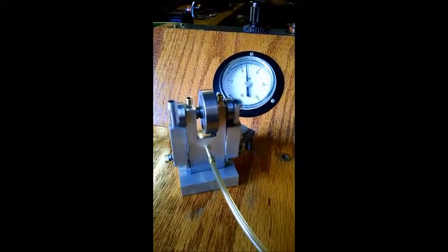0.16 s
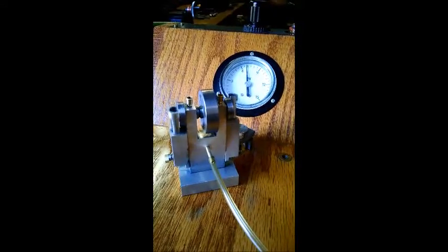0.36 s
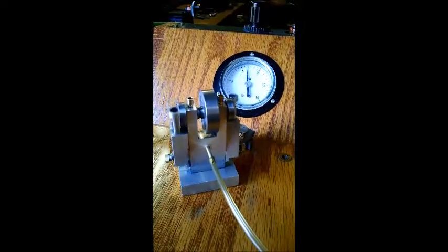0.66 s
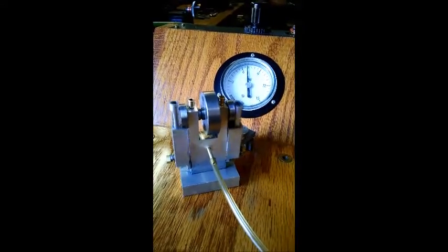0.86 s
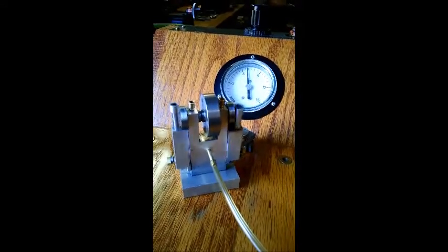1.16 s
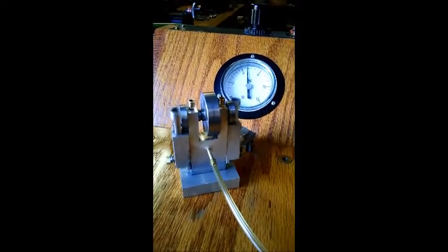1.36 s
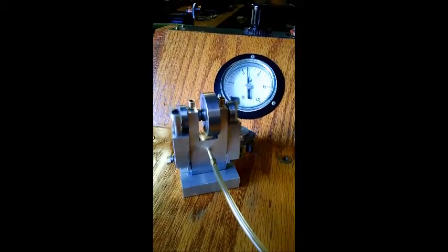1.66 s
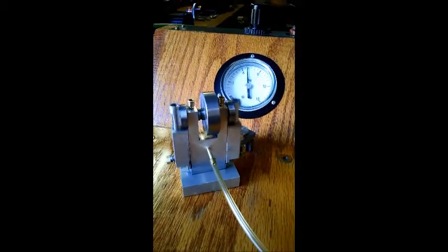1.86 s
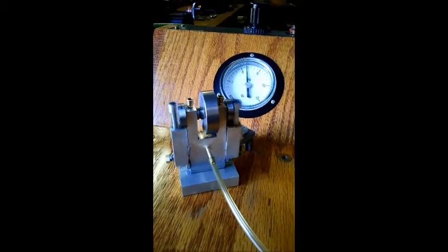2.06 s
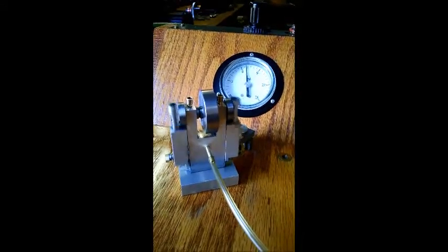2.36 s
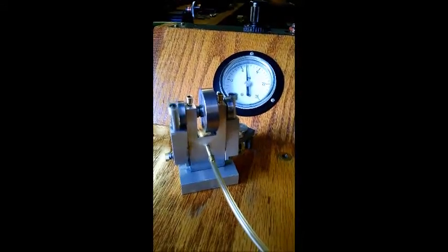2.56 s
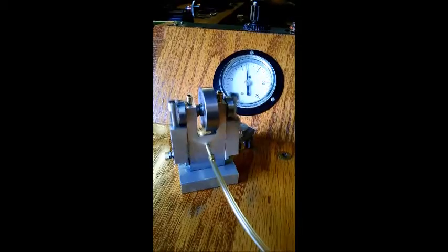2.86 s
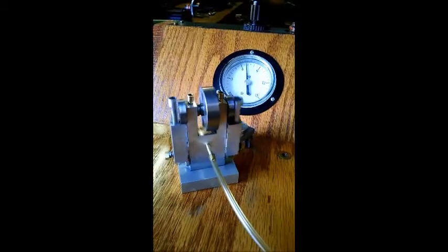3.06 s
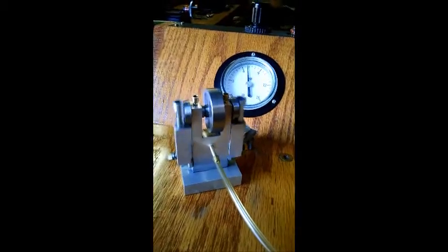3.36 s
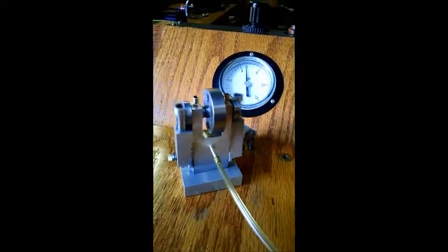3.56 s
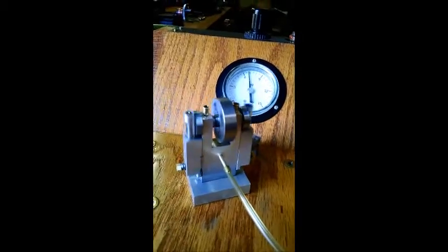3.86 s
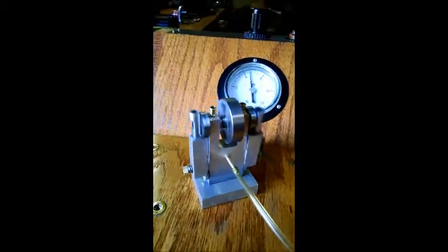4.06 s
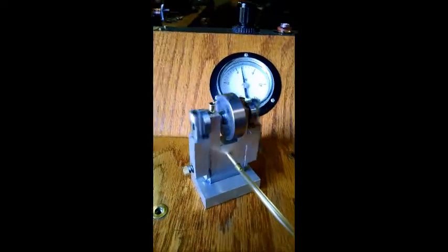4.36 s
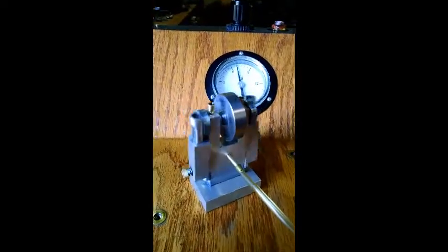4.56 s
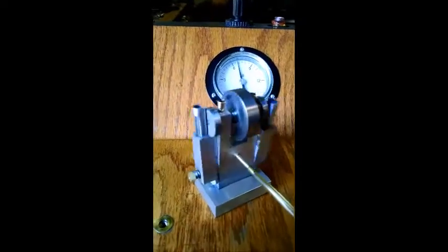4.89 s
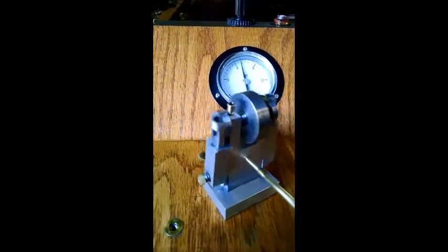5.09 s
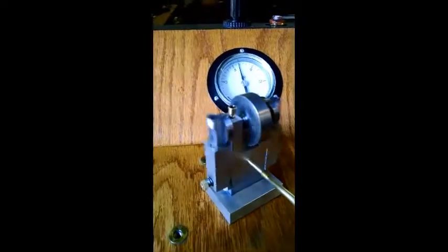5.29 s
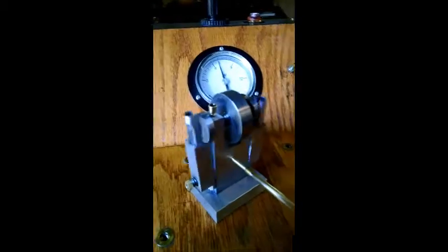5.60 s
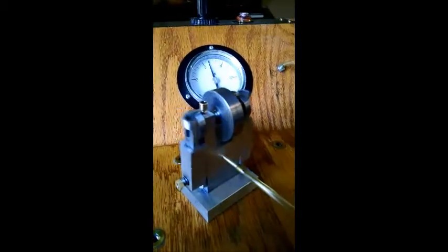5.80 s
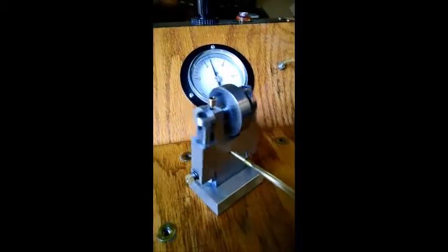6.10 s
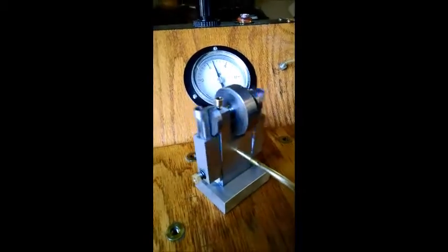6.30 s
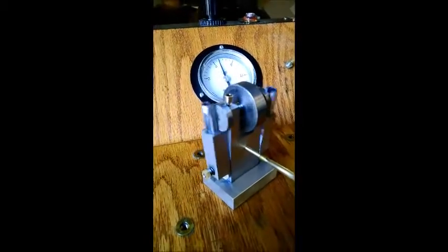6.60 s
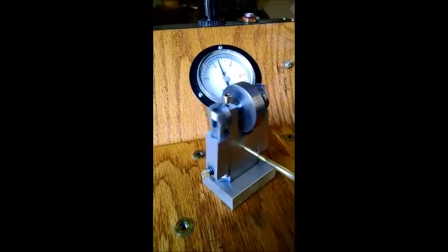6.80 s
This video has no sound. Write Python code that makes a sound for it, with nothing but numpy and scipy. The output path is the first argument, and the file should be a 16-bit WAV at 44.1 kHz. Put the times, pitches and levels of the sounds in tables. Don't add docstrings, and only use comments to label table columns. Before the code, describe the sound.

A steady fast rhythm of bright, spitting exhaust bursts, each followed by a softer second puff, with short dull knocks from the wooden tabletop and dry metallic clicking and rattling. Continuous thin air hiss pulses with the rhythm over a faint low room murmur. Recorded very close on a handheld phone in stereo; after it moves round, a high airy whistle grows, with small handling knocks and a brief sleeve brush near the end.

```python
import sys
import numpy as np
from scipy import signal
from scipy.fft import rfft, irfft
from scipy.io import wavfile
from scipy.ndimage import uniform_filter1d

SR = 44100
rng = np.random.default_rng(int(sys.argv[2]) if len(sys.argv) > 2 else 0)


def how_loud(loudness_db):
    steps = np.asarray(loudness_db, float) / 20
    return 10 ** steps


def store_wav(level_fs):
    pcm = np.round(np.clip(np.atleast_2d(level_fs), -1, 1) * 32767)
    wavfile.write(sys.argv[1], SR, pcm.T.astype(np.int16))


N = 306054
T = np.arange(N) / SR
HZ = np.fft.rfftfreq(N, 1 / SR)
TURN_ROUND_S = 3.8, 4.5

# [f/Hz, crack treble level/dB, crack body level/dB, blow-down level/dB, leak level/dB]
AIR_COLOURS = [(1445, -43, -15, -33, -37), (2680, -43, -12.5, -24, -6), (3756, -45, -11.5, -18.5, -15),
               (5420, -47, 8.5, -2.5, -10.5), (6570, -34, -6, -1, -21.5), (7860, -34, 7.5, 5, -10.5),
               (8830, -18, -4, -8, 1.5), (10500, -14, -7.5, -4.5, -6.5), (12500, -16, -15, -1, -14.5),
               (15500, -8, -28, -4.5, -21)]
# [t/s, hiss level/dB, whistle level/dB]
FITTING = [
    (0, -42.5, -52),
    (1.501, -42, -59),
    (3.001, -41.5, -61),
    (4, -41.5, -57),
    (4.8, -40, -42),
    (5.8, -40, -42),
    (6.94, -39.5, -47),
]
# [f/Hz, t60/s, then level/dB in each of the four clacks]
FRAME_MODES = [(314, 0.036, -7, -11.5, 1.5, 1.5), (432, 0.033, -4.5, -5.5, -2, -35),
               (817, 0.046, -8, -7.5, -4, 1), (942.6, 0.052, -6, -8.5, -9, -30),
               (1032, 0.023, -0.5, 5.5, 6.5, 11), (1201, 0.044, -6, -5.5, 0.5, 1.5),
               (1357, 0.035, -2.5, 9, 2, 4.5), (1527, 0.0081, -10, -7.5, -5, -44),
               (1893, 0.068, -21.5, -4.5, -11.5, -13), (2183, 0.022, -11, -7, -5.5, -18),
               (3293, 0.025, -13, -31, -19, -3)]


def exhaust():
    # [f/Hz, level/dB]
    shade = [(4500, -2.5), (5400, -5.5), (6300, 0), (7100, 1), (7900, -4), (8600, 0.5), (12000, 0),
             (14600, -2)]
    # [share of turn, top level/dB, rise/dB per turn, fall/dB per turn]
    crack_lobes = [
        (0, 0.5, 195, 162),
        (0.839, -22, 330, 200),
    ]
    blow_lobes = [
        (0, -6, 149, 40.3),
        (0.251, 0, 57.8, 90),
        (.45, -9, 60, 75),
    ]
    crack_s, treble_db, puff_db = crank()[:3]
    chance = rng.standard_normal((3, len(crack_s))).clip(-2, 2)
    treble_db = treble_db + 0.3 * chance[0]
    puff_db = puff_db + 1.0 * chance[1]
    body_db = -30.5
    turns = angle()
    nearest = np.round(turns).astype(int)
    crack_db = opening(turns, crack_lobes, shut_db=-33.5)
    blow_db = opening(turns, blow_lobes, shut_db=-39)
    crack_db *= 1 + 0.1 * chance[2][nearest]

    hz, treble, body, blow, _ = np.transpose(AIR_COLOURS)
    flutter_db = 0.94 * walk(150)
    out = colour(hz, treble) * how_loud(crack_db + treble_db[nearest] + flutter_db)
    out += colour(hz, body) * how_loud(0.55 * crack_db + body_db + 2.5 + flutter_db)
    puff = colour(hz, blow) * how_loud(blow_db + np.interp(T, crack_s + 0.035, puff_db) + 1.5 * walk(90))
    low = signal.sosfiltfilt(signal.butter(4, 10500, fs=SR, output="sos"), puff)
    high = puff - low
    turned = phone_turned()
    out += low * how_loud(0.47 * walk(8.5))
    out += high * how_loud(0.71 * walk(11) + 0.5 * turned)
    shaded = irfft(rfft(out) * how_loud(np.interp(HZ, *np.transpose(shade))), N)
    return turned * out + (1 - turned) * shaded


def table_thumps():
    # [f/Hz, level/dB, t60/s]
    table_modes = [(193, -23, 0.26), (238.7, -8, 0.17), (329.8, -2.5, 0.11), (389, 13.5, 0.02),
                   (428.7, 0, 0.1), (545, -9.5, 0.04), (729, -9, .03)]
    out = np.zeros((2, N))
    hard_db, soft_db = crank()[3:]
    hard_db = hard_db + odd_turns()[0]
    for share, level_db in ((0.362, hard_db), (0.894, soft_db)):
        for s, db in beats(share, level_db, scatter_db=0.5):
            strike(out, s, db, *np.transpose(table_modes), push_s=0.0012)
    return out


def linkage_clacks():
    # [share of turn after the crack, level/dB, scatter/dB, level change once the phone has turned/dB]
    clack_rows = [
        (-.165, -33.5, 1.64, 1.1),
        (.006, -34.5, 1.3, -1.5),
        (.203, -37, 2, -0.5),
        (.37, -38, 2.5, -1.4),
    ]
    out = np.zeros((2, N))
    hz, t60, *mode_levels = np.transpose(FRAME_MODES)
    extra_db = odd_turns()[1]
    for k, (share, level_db, scatter_db, turned_db) in enumerate(clack_rows):
        level_db = level_db + np.interp(crank()[0], TURN_ROUND_S, [0, turned_db])
        if k == len(clack_rows) - 1:
            level_db = level_db + extra_db
        for s, db in beats(share, level_db, scatter_db):
            strike(out, s, db, hz, mode_levels[k], t60, push_s=0.0007)
    return out


def valve_ticks():
    # [f/Hz, level/dB, t60/s]
    valve_modes = [(3100, 0, .015), (3500, 0, .015), (3950, -2, .012)]
    out = np.zeros((2, N))
    for s, db in beats(0.725, -52, scatter_db=2.0):
        strike(out, s, db, *np.transpose(valve_modes), push_s=0.0003)
    return out


def rattle():
    out = np.zeros((2, N))
    hz, t60, mode_db = np.transpose(FRAME_MODES)[:3]
    taps_per_s = 150
    for when, size in rng.random((int(taps_per_s * N / SR), 2)):
        db = -51.5 - 2.5 * np.log(size + 0.00029)
        strike(out, when * T[-1], db, hz, mode_db, 0.59 * t60, push_s=0.0004, scatter_db=8.0, detune=0.069)
    return out


def leak():
    s, hiss_db, _ = np.transpose(FITTING)
    air = np.transpose(AIR_COLOURS)
    return colour(air[0], air[4]) * how_loud(np.interp(T, s, hiss_db) + supply_swing() + 2.6 * walk(40))


def whistle():
    s, _, whistle_db = np.transpose(FITTING)
    hz = 9100 + 330 * np.array([-3, -1, 0, 1, 2, 4])
    level_db = np.interp(T, s, whistle_db) + supply_swing() + 3.0 * walk(45)
    near, far = colour(hz, [-22, -4, 0, -5, -13, -24]) * how_loud(level_db)
    return np.array([near, 0.41 * near + 0.13 * far])


def hand_bumps():
    # [t/s, level/dB, f/Hz, t60/s]
    bump_rows = [
        (0.1534, -34, 170, 0.049),
        (0.1528, -26, 540, 0.0054),
        (3.29, -39, 90, .12),
        (4.271, -42, 95, 0.11),
        (5.257, -36, 408, 0.056),
        (5.258, -39, 1350, 0.024),
    ]
    out = np.zeros((2, N))
    for s, db, hz, t60 in bump_rows:
        modes_hz = hz * np.array([1, 1.35, 1.75])
        strike(out, s, db, modes_hz, np.array([0, 0, -3.0]), t60 * np.ones(3), push_s=0.0008)
    return out


def sleeve_brush():
    # [t/s, level/dB]
    brush_db = [
        (5.98, -45),
        (6.0, -35),
        (6.05, -28.5),
        (6.1, -33),
        (6.14, -44),
        (6.2, -66),
    ]
    brush = colour([900, 1500, 2500, 5000, 9000, 14000], [-8, -4.5, -7.5, -2.0, -1.5, -11.5])
    return brush * how_loud(np.interp(T, *np.transpose(brush_db), left=-90, right=-90) + 1.2 * walk(120))


def room():
    # [f/Hz, level/dB]
    murmur = [(25, -1), (33, -2.5), (48, -3), (60, 1), (72, 1.5), (160, -8), (250, -10.5), (440, -2),
              (600, -9), (1300, -12), (2000, -21.5), (4000, -27.5)]
    return colour(*np.transpose(murmur)) * how_loud(-45.5 + 0.43 * walk(6))


def crank():
    # [crack t/s, crack treble level/dB, second puff level/dB, hard thump level/dB,
    # soft thump level/dB]
    third_turns = [(-0.0299, -18, -28.5, -32.5, -33.5), (0.411, -23, -28, -30.5, -31.5),
                   (0.8506, -20.5, -29.5, -28.5, -34), (1.286, -23, -28.5, -32.5, -34.5),
                   (1.7222, -22, -29, -32, -32.5), (2.155, -22.5, -28, -34, -33),
                   (2.588, -23.5, -28, -29.5, -32.5), (3.02, -20, -30, -30, -32.5),
                   (3.4482, -22, -29.5, -29, -31.5), (3.8736, -19.5, -27.5, -30, -32.5),
                   (4.2993, -20, -29.5, -33, -32.5), (4.727, -21.5, -30.5, -29, -29.5),
                   (5.158, -20.5, -30, -29.5, -31.5), (5.583, -22, -29.5, -26.5, -30),
                   (6.008, -21, -31.5, -26.5, -30.5), (6.434, -22.5, -31.5, -27, -34.5),
                   (6.862, -23, -30.5, -27, -32), (7.287, -23, -34, -31, -30)]
    row_at = np.arange(len(third_turns))
    turn_at = np.arange((len(third_turns) - 1) * 3 + 1) / 3
    return [np.interp(turn_at, row_at, column) for column in np.transpose(third_turns)]


def angle():
    crack_s = crank()[0]
    return np.interp(T, crack_s, np.arange(len(crack_s)))


def from_share(turns, share):
    return (turns - share + 0.5) % 1 - 0.5


def opening(turns, lobes, shut_db):
    power = how_loud(shut_db) ** 2
    for share, top_db, rise, fall in lobes:
        past = from_share(turns, share)
        power = power + how_loud(top_db - np.where(past > 0, fall, -rise) * past) ** 2
    return 10 * np.log10(power)


def supply_swing():
    # [share of turn, level/dB, width/turns]
    pulls = [
        (0.905, -4, 0.015),
        (0.089, -0.5, 0.036),
        (.37, -2, 0.02),
        (.55, -2.5, 0.042),
        (.7, 2.5, 0.05),
    ]
    turns = angle()
    return sum(db * np.exp(-0.5 * (from_share(turns, share) / width) ** 2) for share, db, width in pulls)


def odd_turns():
    odd_rows = {7: (1.8, 4.2), 11: (2.6, 8.4), 16: (-10, -1.1), 22: (2.5, 4.1), 30: (-8, -2.3), 33: (-7, 0),
                35: (1, 7), 38: (3.8, 3.6), 39: (1.4, -1)}
    return np.transpose([odd_rows.get(turn, (0, 0)) for turn in range(len(crank()[0]))])


def beats(share, db, scatter_db):
    crack_s = crank()[0]
    turns = np.arange(len(crack_s))
    chance = rng.standard_normal((2, len(crack_s))).clip(-2, 2)
    when = np.interp(turns + share, turns, crack_s) + 0.0008 * chance[0]
    return [row for row in zip(when, db + scatter_db * chance[1]) if 0 < row[0] < T[-1]]


def strike(out, s, db, hz, mode_db, t60, push_s, scatter_db=1.2, detune=0.006):
    t = np.arange(int(min(0.14, t60.max()) * SR)) / SR
    chance = rng.standard_normal((3, len(hz)))
    pitch = hz * (1 + detune * chance[0])
    modes = np.exp(np.outer(2j * np.pi * pitch - np.log(1000) / t60, t))
    size = how_loud(mode_db + scatter_db * chance[1])
    sizes = np.array([size, size * np.exp(2.51j * chance[2])])
    ring = (sizes @ modes).imag * (1 - np.exp(-t / push_s)) ** 2
    ring *= how_loud(db + 3.5) / np.abs(ring[0]).max()
    i = max(int((s - push_s) * SR), 0)
    out[:, i:i + len(t)] += ring[:, :N - i]


def colour(hz, db):
    gain = how_loud(np.interp(np.log(HZ + 1), np.log(hz), db, left=-90))
    x = irfft(rfft(rng.standard_normal((2, N))) * gain, N)
    return x / x.std()


def walk(rate):
    k = int(SR / rate)
    steps = np.repeat(rng.standard_normal(N // k + 1), k)
    return uniform_filter1d(uniform_filter1d(steps, k), k)[:N]


def phone_turned():
    return np.interp(T, TURN_ROUND_S, [0, 1])


def ports(paths):
    # [f/Hz, lead before the turn/rad, lead after/rad]
    lead_rows = [(100, -3.1, -3.1), (250, -.55, -.4), (2000, .3, .4), (2330, 3.0, 2.9), (2700, 3.4, 3.35),
                 (3400, 6.15, 6.1), (4000, 6.35, 6.4), (4300, 6.9, 8.3), (4700, 9.1, 9.42),
                 (5200, 9.75, 9.42), (5650, 10.8, 10.0), (9000, 18.8, 18.7), (9950, 21.7, 20.3),
                 (10260, 22.0, 20.6), (10330, 22.05, 23.6), (10600, 22.3, 23.9), (16000, 36.3, 36.0)]
    # [f/Hz, right port's own path against the shared one/dB, left minus right/dB]
    balance = [(60, 2, -4.5), (300, -4, -4.5), (700, 0, -1), (1300, -13, 0), (2050, 0, 0), (2500, -10, 0),
               (3050, -1, .5), (3750, -11, 0), (4350, -8, 1), (5300, -13, 0), (6100, 2, -1.5),
               (7600, 6, -2.5), (9000, -5, 0), (10300, -7, 0), (12800, 2, -2), (14000, -5, 2.5),
               (15200, 1, -2.5)]
    shared, own = rfft(paths)
    hz, own_db, pan_db = np.transpose(balance)
    ratio = how_loud(np.interp(HZ, hz, own_db))
    pan = how_loud(np.interp(HZ, hz, pan_db) / 2)
    right = (shared + ratio * own) / np.sqrt(1 + ratio ** 2) / pan
    hz, *leads = np.transpose(lead_rows)
    before, after = (irfft(right * np.exp(1j * np.interp(HZ, hz, lead)), N) for lead in leads)
    turned = phone_turned()
    return np.array([irfft(shared * pan, N), (1 - turned) * before + turned * after])


def joint_stereo(x):
    lead_in = 291
    both = np.pad(np.array([x[0] + x[1], x[0] - x[1]]) / 2, ((0, 0), (lead_in, 0)))
    frames = dict(window="cosine", nperseg=2048, noverlap=1024)
    z = signal.stft(both, **frames)[2]
    edges = np.r_[0, 48:208:8, 208:570:16]
    power = np.add.reduceat(np.abs(z) ** 2, edges, axis=1)
    total = power.sum((0, 1))
    drop_db = -9.5 + 2.5 * rng.standard_normal(power.shape)
    strong = power > power[::-1] * how_loud(drop_db) ** 2
    attack = total > np.roll(total, 1) * how_loud(4.5) ** 2
    keep = strong | attack
    keep[:, 0] = True
    band = np.searchsorted(edges, np.arange(z.shape[1]), side="right") - 1
    mid, side = signal.istft(z * keep[:, band], **frames)[1][:, lead_in:lead_in + N]
    return np.array([mid + side, mid - side])


def scene():
    engine = exhaust() + table_thumps() + linkage_clacks() + valve_ticks() + rattle()
    around = leak() + hand_bumps() + sleeve_brush() + room()
    return ports(engine + around) + whistle()


def band_limit(x):
    return signal.sosfilt(signal.butter(12, 16060, fs=SR, output="sos"), x)


def record(dry):
    # [f/Hz, level/dB]
    port_ring = [(12900, 0), (13400, 6), (14050, 11.5), (14900, 5), (15400, 10)]
    top = how_loud(np.interp(HZ, *np.transpose(port_ring))) / (1 + (HZ / 15500) ** 300)
    mix = joint_stereo(irfft(rfft(dry) * top, N))
    return band_limit(mix)


dry = scene()
out = record(dry)
store_wav(out)
```